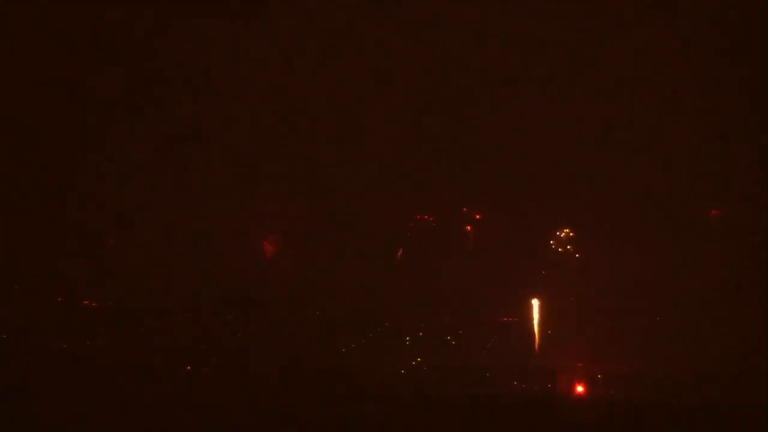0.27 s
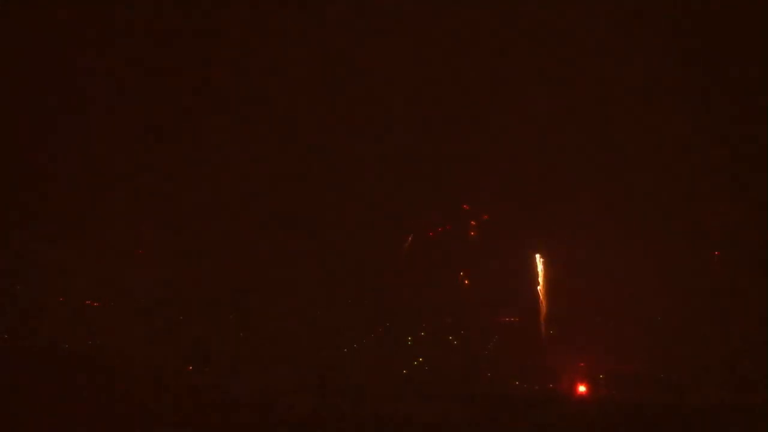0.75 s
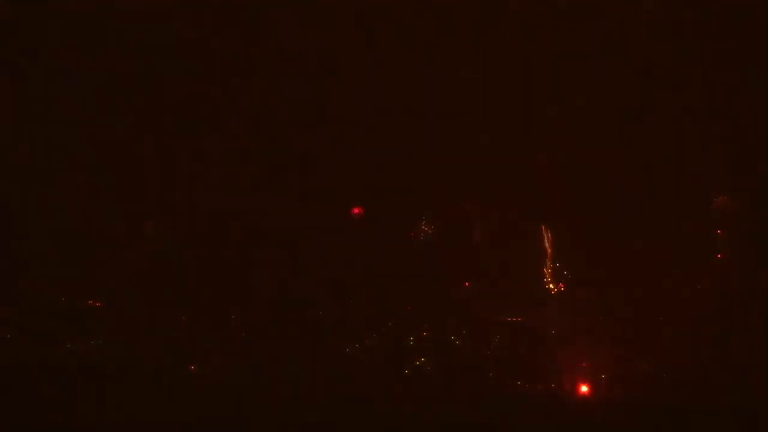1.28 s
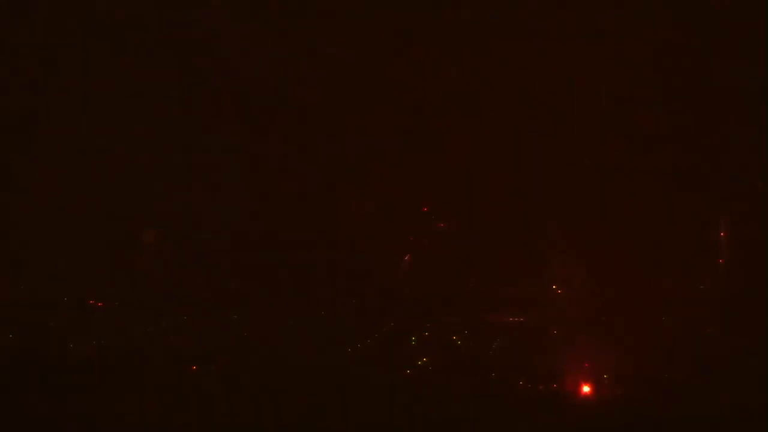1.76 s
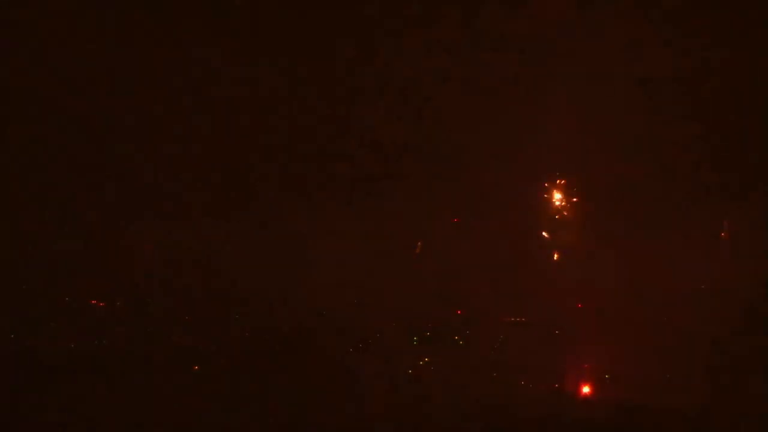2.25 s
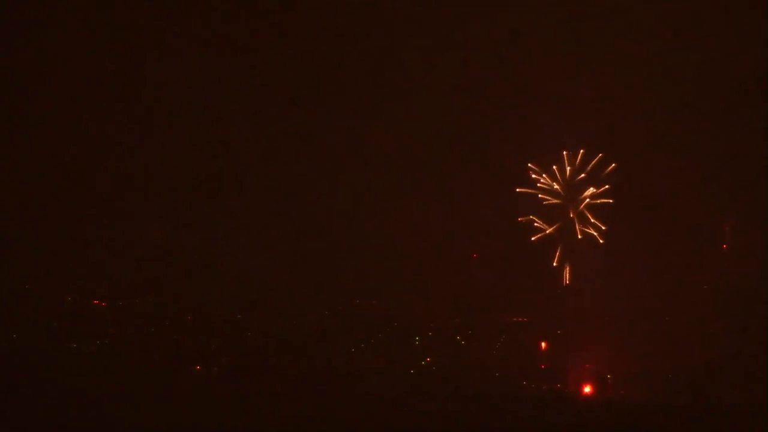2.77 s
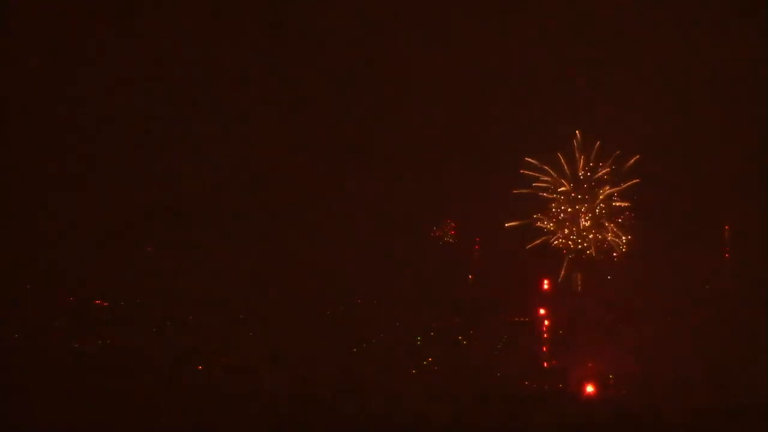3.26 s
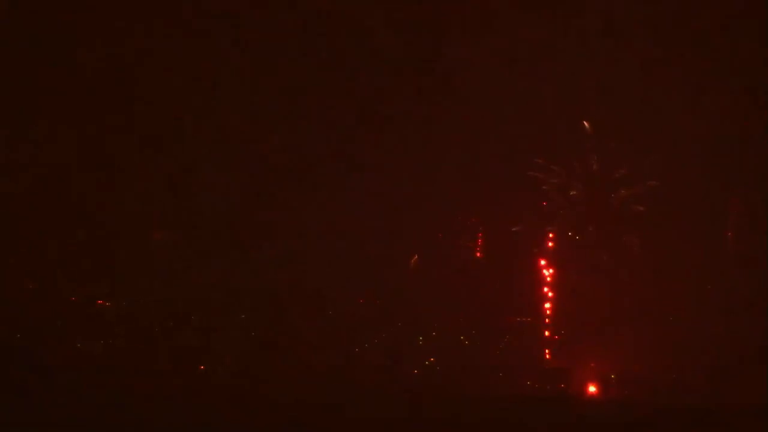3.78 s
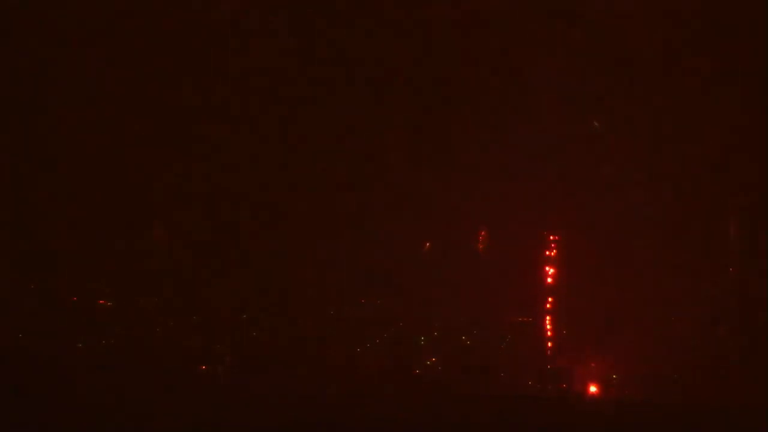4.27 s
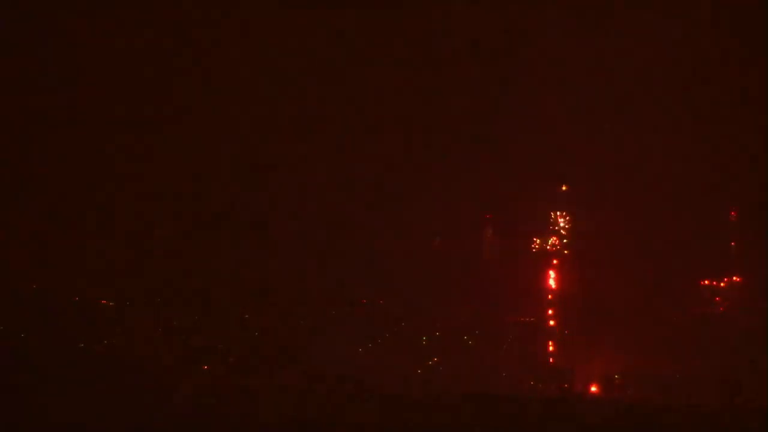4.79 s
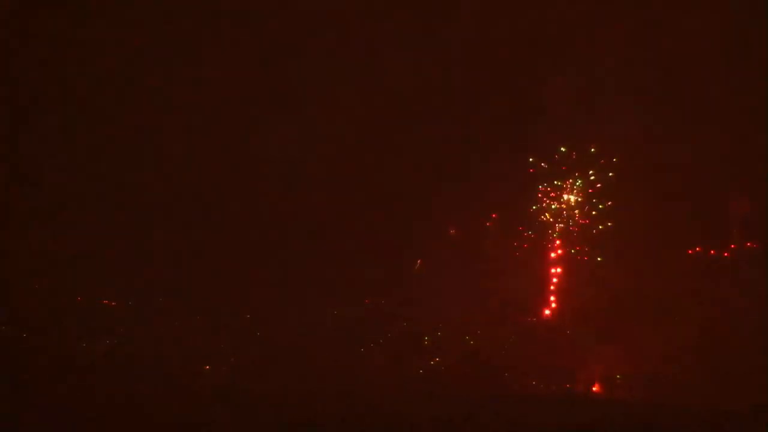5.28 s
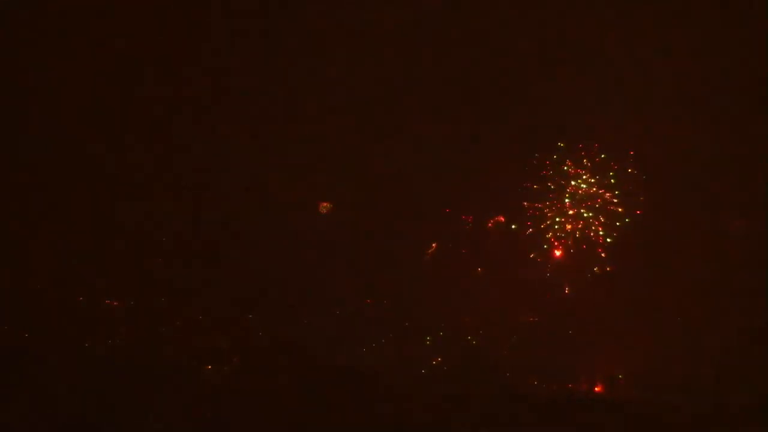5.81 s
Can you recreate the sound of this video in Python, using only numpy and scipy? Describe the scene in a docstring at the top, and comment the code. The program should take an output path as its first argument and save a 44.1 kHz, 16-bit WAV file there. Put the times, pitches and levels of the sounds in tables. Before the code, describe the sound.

Fireworks burst across a city at night, heard from far off in mono through a small microphone. Throughout, countless distant bursts merge into a dull roll with fine crackle, while hollow rocket thuds knock irregularly several times a second and small dry pops tick on top. Two deep booms and a few snaps come in the first 0.3 seconds, with a softer boom near 1.4 and a stronger one at about 2.1. Nearer firecrackers snap here and there, each trailing a short cluster of echoes from buildings. The sharpest, loudest crack hits at 3.2 seconds, with a lesser one at 3.4. Another crack at 4.2 leads into the heaviest boom at 4.3. Snaps and thuds bunch up around 4.9 and 5.4. From about 5.6 the distant barrage swells, with a further boom near 6 seconds. The loudest reports briefly overload the microphone.

```python
"""Firework shells boom over a city at night, heard from far off through one small microphone.
Nearer crackers snap and far rockets thud; buildings scatter each report into a short cluster of echoes.
Behind them countless smaller bursts merge into a roll with a fine crackle and a few small pops.
The loudest reports overload the recorder."""
import sys
import numpy as np
from scipy import signal
from scipy.fft import rfft, irfft
from scipy.io import wavfile
from scipy.ndimage import uniform_filter1d, minimum_filter1d

SR = 44100
rng = np.random.default_rng(int(sys.argv[2]) if len(sys.argv) > 2 else 0)


def transcribe(signal):
    """Save signal, clipped to [-1, 1], as a 16-bit WAV file at the path in sys.argv[1]."""
    frames = np.atleast_2d(signal).T
    limited = np.clip(frames, -1, 1)
    pcm = np.round(limited * 32767).astype(np.int16)
    wavfile.write(sys.argv[1], SR, pcm)


N = 266364


def undb(db):
    """Decibels to gain."""
    return 10 ** (np.asarray(db) / 20)


def add(out, s, x):
    """Mix x into out from time s."""
    start = int(np.clip(s * SR, 0, N - 1))
    out[start:start + len(x)] += x[:N - start]


# resonances and dips of the microphone housing: f/Hz, width/Hz, lift/dB
HOUSING_EQ = [(1500, 340, 5), (2250, 230, -2.5), (2530, 230, 1), (2615, 210, -2.5), (3007, 220, 6.5),
              (3460, 340, -5), (3900, 140, -1), (4580, 140, -2.5), (4600, 130, 5)]


def colour(x, tone, size=4096):
    """Shape x with an EQ curve (f/Hz, level/dB) and the ring of the microphone housing."""
    hz = np.maximum(np.arange(size // 2 + 1) * SR / size, 1)
    tone_hz, tone_db = np.transpose(tone)
    db = np.interp(np.log(hz), np.log(tone_hz), tone_db)
    db += sum(lift / (1 + (2 * (hz - centre) / width) ** 2) for centre, width, lift in HOUSING_EQ)
    cepstrum = irfft(np.log(undb(db)))
    cepstrum[1:size // 2] *= 2  # minimum phase: nothing rings ahead of the attack
    cepstrum[size // 2 + 1:] = 0
    impulse_response = irfft(np.exp(rfft(cepstrum)))
    return signal.fftconvolve(x, impulse_response)[:len(x)]


def fade(t60, size=32768):
    """Exponential decay of unit energy, falling 60 dB in t60 seconds."""
    shape = np.exp(-np.log(1000) * np.arange(size) / SR / max(t60, .002))
    return shape / np.linalg.norm(shape)


def echoes(t60, rise_s):
    """Reflections from many walls: a cluster of random arrivals that builds up and dies away."""
    shape = fade(t60)
    t = np.arange(len(shape)) / SR
    shape *= 1 - np.exp(-(t / max(rise_s, .0002)) ** 2)
    return shape / np.linalg.norm(shape) * rng.standard_normal(len(shape))


def early_reflections(t60, rise_s, size=8192):
    """The first, tight cluster of arrivals, its spectrum evened out so the attack sounds full."""
    spectrum = rfft(echoes(t60, rise_s)[:size])
    cluster = irfft(spectrum / np.abs(spectrum)) * np.sqrt(fade(t60)[:size])
    return cluster / np.linalg.norm(cluster)


def report(tone, db, rise_s, direct_db, early_t60, echo_t60, echo_db, tail_t60, tail_db):
    """One burst: the direct pulse, early reflections, echoes from the blocks around and a tail."""
    arrivals = undb(echo_db) * echoes(echo_t60, rise_s) + undb(tail_db) * echoes(tail_t60, rise_s)
    add(arrivals, 0, early_reflections(early_t60, rise_s))
    arrivals[0] += undb(direct_db)
    bang = colour(arrivals, tone)
    loudest_power = uniform_filter1d(bang ** 2, size=353, mode="constant").max()
    return bang * undb(db) / np.sqrt(loudest_power)  # the loudest 8 ms set the level


def swarm(tone, per_s, spread_db, t60, echo_db, wash_db):
    """Countless far bursts at random times, each with its echoes, over a wash of reverb; rms 1."""
    when, softness = rng.random((int(per_s * N / SR), 2)).T
    pulses = np.zeros(N)
    pulses[(when * (N - 1)).astype(int)] = undb(-spread_db * softness)
    pulses /= pulses.std()
    echo_power = np.abs(signal.fftconvolve(pulses ** 2, fade(t60) ** 2)[:N])
    scatter = np.sqrt(undb(echo_db) ** 2 * echo_power + undb(wash_db) ** 2) * rng.standard_normal(N)
    sound = colour(pulses + scatter, tone)
    return sound / sound.std()


# the far bed eases near 4 s, then a barrage sets in: t/s, low fader/dB, crackle fader/dB
BED_FADERS = [(0.0, -20.5, -33.5), (0.893, -22, -35), (0.969, -20, -37), (1.43, -21.5, -31),
              (1.981, -23, -37), (2.241, -20.5, -34), (2.49, -19.5, -34), (3.15, -23, -36.5),
              (3.45, -21, -34.5), (3.649, -22.5, -35.5), (3.991, -28, -37.5), (4.22, -19.5, -35),
              (4.36, -23, -33), (5.18, -24, -35), (5.62, -14.5, -29.5), (6.04, -18.5, -33.5)]


def bed_faders(s):
    """The bed's low and crackle faders at time s, in dB."""
    times, *faders = np.transpose(BED_FADERS)
    return [np.interp(s, times, fader) for fader in faders]


# shells, rockets and firecracker strings, darkened by the air: f/Hz, level/dB
SHELL_EQ = [(20, -22), (50, -16.5), (72, -8), (120, -0.5), (180, -4), (300, -11), (600, -27.5), (1500, -44),
            (4000, -83.5), (7000, -110)]
ROCKET_EQ = [(50, -23), (140, -4.5), (260, 0), (350, 0), (460, -2), (600, -13.5), (900, -24), (1800, -30.5),
             (3200, -40.5), (6000, -75.5), (12000, -100)]
CRACKLE_EQ = [(200, -14.5), (650, 5.5), (950, -7.5), (1800, -3), (2200, -13.5), (3200, -16), (3550, -23),
              (4600, -35), (5200, -46), (5800, -50.5), (8000, -69.5), (15000, -91)]


def far_bed():
    """The most distant shells, rockets and firecracker strings run together into a bed."""
    low_db, crackle_db = bed_faders(np.arange(N) / SR)
    rumble = swarm(SHELL_EQ, per_s=56, spread_db=11.5, t60=0.065, echo_db=0, wash_db=-2)
    roll = swarm(ROCKET_EQ, per_s=110, spread_db=17, t60=0.068, echo_db=-0.5, wash_db=1.5)
    crackle = swarm(CRACKLE_EQ, per_s=120, spread_db=24.5, t60=0.14, echo_db=5.5, wash_db=6)
    low_end = rumble * undb(-6) + roll * undb(-1.16)
    return low_end * undb(low_db) + crackle * undb(crackle_db + 1.5)


# a small firecracker through the air, peaky in the mids: f/Hz, level/dB
POP_EQ = [(300, -19), (1000, -11.5), (1700, 3.5), (2400, -11), (3200, -8), (4000, -20), (5000, -30),
          (6000, -45.5), (9000, -70.5)]
# single firecrackers: t/s, level/dB
POP_CUES = [(1.035, -34), (1.765, -39), (2.16, -45), (2.336, -36), (3.151, -36.5), (3.647, -36.5),
            (3.765, -41), (5.008, -30.5), (5.767, -32.5), (5.798, -28.5)]


def pops():
    """Small single firecrackers: short dry ticks on top of the crackle."""
    out = np.zeros(N)
    for s, db in POP_CUES:
        add(out, s, report(POP_EQ, db, rise_s=0.0014, direct_db=-13, early_t60=0.017,
                           echo_t60=0.044, echo_db=-0.5, tail_t60=0.25, tail_db=-18.5))
    return out


def thud(db, t60, pitch_hz, hump_db=4, hump_octaves=0.26):
    """One far rocket: the air has taken its treble, leaving a hollow knock with a pitch of its own."""
    tone_hz, tone_db = np.transpose(ROCKET_EQ)
    hz = np.geomspace(tone_hz[0], tone_hz[-1], 64)
    lift_db = hump_db * np.exp(-(np.log2(hz / pitch_hz) / hump_octaves) ** 2)
    tone = np.column_stack([hz, np.interp(np.log(hz), np.log(tone_hz), tone_db) + lift_db])
    return report(tone, db, rise_s=0.0037, direct_db=-6, early_t60=0.056,
                  echo_t60=t60, echo_db=2.5, tail_t60=0.32, tail_db=-6)


# far rockets that stand out of the roll: t/s, level/dB, echo t60/s, pitch/Hz
ROCKET_CUES = [(0.118, -6.5, 0.094, 283), (0.248, -11.5, 0.14, 235), (0.297, -30, 0.055, 330),
               (0.488, -15.5, 0.19, 350), (0.542, -19, 0.042, 340), (0.627, -15, 0.07, 280),
               (0.674, -15.5, 0.2, 340), (0.715, -13.5, 0.11, 360), (0.765, -28, 0.053, 280),
               (0.811, -13.5, 0.032, 300), (0.84, -16.5, 0.16, 364), (0.877, -15, 0.076, 330),
               (0.942, -14.5, 0.068, 375), (1.062, -28.5, 0.042, 320), (1.168, -15, 0.08, 290),
               (1.253, -15, 0.076, 365), (1.331, -19.5, 0.069, 285), (1.386, -13.5, 0.081, 305),
               (1.417, -10.5, 0.12, 377), (1.443, -13.5, 0.05, 380), (1.503, -9, 0.15, 358),
               (1.545, -23.5, 0.06, 360), (1.729, -18.5, 0.09, 340), (1.859, -16, 0.086, 290),
               (1.975, -12.5, 0.18, 320), (2.018, -18.5, 0.06, 330), (2.226, -15, 0.11, 370),
               (2.271, -18.5, 0.06, 320), (2.329, -14, 0.093, 400), (2.385, -13, 0.051, 300),
               (2.438, -15.5, 0.049, 425), (2.555, -15, 0.11, 363), (2.583, -14, 0.33, 315),
               (2.639, -16.5, 0.17, 345), (2.667, -12.5, 0.056, 330), (2.688, -14.5, 0.11, 365),
               (2.734, -14, 0.029, 380), (2.788, -15, 0.12, 315), (2.869, -15, 0.023, 400),
               (2.905, -18.5, 0.12, 350), (2.939, -11.5, 0.038, 370), (2.984, -12, 0.11, 420),
               (3.136, -15, 0.22, 330), (3.193, -6, 0.061, 371), (3.218, -11, 0.1, 320),
               (3.308, -13.5, 0.09, 280), (3.366, -16, 0.07, 370), (3.39, -9.5, 0.17, 366),
               (3.535, -13.5, 0.049, 290), (3.589, -7, 0.13, 335), (3.721, -17.5, 0.065, 300),
               (3.762, -17, 0.068, 370), (3.826, -11, 0.021, 365), (3.951, -16.5, 0.03, 342),
               (4.004, -12.5, 0.049, 380), (4.168, -7.5, 0.15, 310), (4.229, -14, 0.095, 279),
               (4.332, -10.5, 0.097, 276), (4.368, -13.5, 0.084, 320), (4.447, -8.5, 0.03, 298),
               (4.548, -14, 0.08, 404), (4.597, -19.5, 0.04, 380), (4.648, -17, 0.035, 350),
               (4.74, -12.5, 0.018, 348), (4.8, -5, 0.019, 363), (4.88, -6, 0.12, 340),
               (4.954, -16.5, 0.05, 350), (5.004, -15.5, 0.031, 310), (5.055, -17.5, 0.14, 355),
               (5.089, -17.5, 0.11, 300), (5.174, -9, 0.26, 280), (5.22, -20.5, 0.06, 330),
               (5.279, -13.5, 0.011, 314), (5.325, -17.5, 0.13, 350), (5.397, -21, 0.06, 330),
               (5.439, -10.5, 0.12, 295), (5.494, -35, 0.05, 350), (5.536, -13, 0.09, 465),
               (5.661, -20, 0.092, 275), (5.772, -12, 0.13, 280), (5.89, -18.5, 0.15, 250),
               (6.014, -9, 0.48, 246)]


def rockets(lesser_per_s=4.8, under_fader_db=7, spread_db=5.5, pitch_range_hz=(240, 428)):
    """Far rockets: the featured thuds, and lesser ones at irregular intervals that ride with the bed."""
    out = np.zeros(N)
    for s, db, t60, pitch_hz in ROCKET_CUES:
        add(out, s, thud(db, t60, pitch_hz))
    for turn, (delay, strength, pitch) in enumerate(rng.random(size=(40, 3))):
        s = (turn + delay) / lesser_per_s
        low_db, _ = bed_faders(s)
        db = low_db - under_fader_db + spread_db * (2 * strength - 1)
        add(out, s, thud(db, t60=0.064, pitch_hz=np.interp(pitch, [0, 1], pitch_range_hz)))
    return out


# a nearer cracker through the air, mids forward: f/Hz, level/dB
CRACKER_EQ = [(100, -37.5), (400, -13), (900, -6), (1300, -2), (1900, -2.5), (2300, -9.5), (3200, -9.5),
              (3650, -21.5), (4200, -32), (5200, -47.5), (5900, -60), (9000, -74.5), (15000, -88)]
# nearer crackers: t/s, level/dB, body/dB, bite/dB, treble/dB, screening (0 in plain sight, 1 hidden)
CRACKER_CUES = [(0.109, -22.5, -3.5, -7.5, 10, 0.49), (0.122, -24.5, 6, -5, 11, 0.39),
                (0.246, -28, -1.5, -3.5, 6.5, 0.98), (0.305, -30.5, 0.5, 2.5, 6, 0.84),
                (0.469, -25, -1.5, -1.5, 5, 0.75), (0.486, -27.5, -2.5, -5, -1, 0.72),
                (0.678, -25.5, -4, -7.5, 2, 0.72), (1.325, -24.5, -5.5, -5, 6.5, 0.5),
                (1.341, -26.5, -4.5, 0.5, 7, 0.37), (1.444, -30, -4, -5, 1.5, 0.56),
                (1.509, -29, -2, -2, -0.5, 0.38), (1.995, -28, 3.5, -2, -9, 0.86),
                (2.235, -27, 0, -0.5, 10, 0.38), (2.284, -27.5, 2, -10, -3, 0.65),
                (2.3936, -20, -9, -19, -19.5, 0.054), (2.559, -21, 7, 0.5, -13.5, 0.045),
                (2.67, -29, 6.5, 1.5, 3, 0.45), (2.694, -23.5, -1, 0, 16, 0.37),
                (2.799, -32, -5, -2, -8, 0.31), (3.1963, -7, 0.5, 2.5, 12.5, 0.0088),
                (3.392, -18, -3.5, 2.5, 11.5, 0.08), (3.498, -33.5, -2.5, 1, -11, 0.14),
                (4.1735, -14, -7, 2, -6.5, 0.02), (4.32, -25, 2, 2.5, 15, 0.94),
                (4.34, -18.5, 5, 4.5, 17.5, 0.38), (4.356, -27, 1.5, 8.5, 2.5, 0.5),
                (4.447, -25.5, -5, -4, 1, 0.59), (4.547, -26, -2.5, -2.5, 2.5, 0.62),
                (4.74, -30, -3.5, -2, 5, 0.78), (4.803, -25.5, -4.5, -2.5, 5, 0.51),
                (4.88, -23.5, 4, -5, 6.5, 0.3), (4.892, -20, 7, 6, -2, 0.55),
                (4.903, -21, -11, 1, 13, 0.36), (5.114, -23, 9.5, 11, 1.5, 0.17),
                (5.178, -26, 4, -10.5, 8, 0.76), (5.441, -16, -3, -11.5, 8.5, 0.16),
                (5.447, -23.5, 1.5, 1, 11, 0.45), (5.538, -25, 9, -2, -7, 0.55),
                (5.619, -27, 2.5, 7, 1, 0.022), (5.977, -24.5, -7, -8.5, 1, 1)]


def crackers():
    """Nearer bursts keep an edge; each path has its own tone, and buildings in the way smear the crack."""
    out = np.zeros(N)
    hz, tone_db = np.transpose(CRACKER_EQ)
    for s, db, body_db, bite_db, treble_db, screening in CRACKER_CUES:
        path_db = np.interp(hz, [1320, 1760, 2270, 3130, 4320, 5500, 7000],
                            [body_db, 0, bite_db, bite_db, treble_db, treble_db, 0])
        tone = np.column_stack([hz, tone_db + path_db])
        # a screened burst is wetter: its echoes build later and hang longer
        rise_s = 0.00071 * (0.0037 / 0.00071) ** screening
        t60 = 0.085 * (0.3 / 0.085) ** screening
        echo_db = np.interp(screening, [0, 1], [-8, 17.5])
        add(out, s, report(tone, db, rise_s, direct_db=-7, early_t60=0.009,
                           echo_t60=t60, echo_db=echo_db, tail_t60=0.46, tail_db=-22))
    return out


def blast_wave(hz, peak_cycles=0.6, size=8192):
    """The punch of a shell: pressure swings back and forth a few times; peak near 1."""
    cycles = hz * np.arange(size) / SR
    age = cycles / peak_cycles
    return age * np.exp(1 - age) * np.sin(2 * np.pi * cycles)


# large shells: t/s, level before the blast and echo trims/dB, echo t60/s, relative size
SHELL_CUES = [(0.116, -5.5, 0.16, 0.92), (0.252, -4.5, 0.51, 1.14), (0.483, -14.5, 0.15, 1.13),
              (1.384, -13, 0.34, 0.93), (2.07, -7, 0.19, 1.05), (3.305, -16.5, 0.18, 0.99),
              (4.315, -0.5, 0.2, 0.93), (4.491, -22, 0.12, 1.1), (4.562, -16.5, 0.11, 1.38),
              (4.674, -22.5, 0.13, 2), (5.361, -19.5, 0.13, 1.35), (5.44, -19, 0.18, 1.7),
              (5.564, -21, 0.11, 1.28), (5.977, -13.5, 0.19, 0.78)]


def shells(blast_hz=147, blast_trim_db=3, echo_trim_db=-3.5, echo_lag_s=0.007):
    """Large shells: a blast wave and a rolling tail; the bigger the shell, the deeper the boom."""
    out = np.zeros(N)
    hz, tone_db = np.transpose(SHELL_EQ)
    for s, db, t60, size in SHELL_CUES:
        add(out, s, undb(db + blast_trim_db) * blast_wave(blast_hz / size))
        tone = np.column_stack([hz / size, tone_db])
        rolling_tail = report(tone, db + echo_trim_db, rise_s=0.0048, direct_db=-18, early_t60=0.15,
                              echo_t60=t60, echo_db=4.5, tail_t60=0.19, tail_db=1)
        add(out, s + echo_lag_s, rolling_tail)
    return out


def scene():
    """All the fireworks sum to mono at one microphone."""
    return (shells() + rockets() + crackers() + pops() + far_bed())[None, :]


def record(dry, ceiling=0.82, detector_s=0.00059, shelf_hz=5700, shelf_db=-4, top_hz=15800):
    """A limiter holds the booms down; the sharpest cracks outrun it and clip. The top is dulled and cut."""
    sensed = np.abs(uniform_filter1d(dry, size=int(detector_s * SR)))
    gain = np.minimum(1, ceiling / np.maximum(sensed, 1e-9))
    gain = uniform_filter1d(minimum_filter1d(gain, size=89), size=89)  # held and smoothed over 2 ms
    clipped = np.clip(dry * gain, -1, 1)
    body = signal.sosfiltfilt(signal.butter(8, shelf_hz, fs=SR, output="sos"), clipped)
    dulled = body + undb(shelf_db) * (clipped - body)
    return signal.sosfilt(signal.ellip(8, .2, 70, top_hz, fs=SR, output="sos"), dulled)


dry = scene()
out = record(dry)
transcribe(out)
```